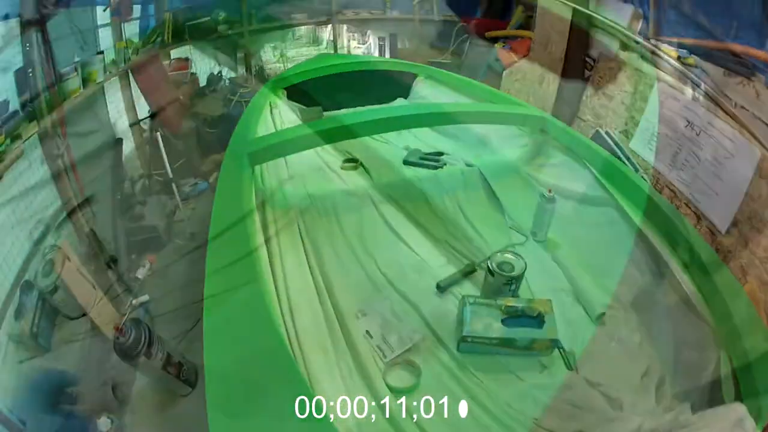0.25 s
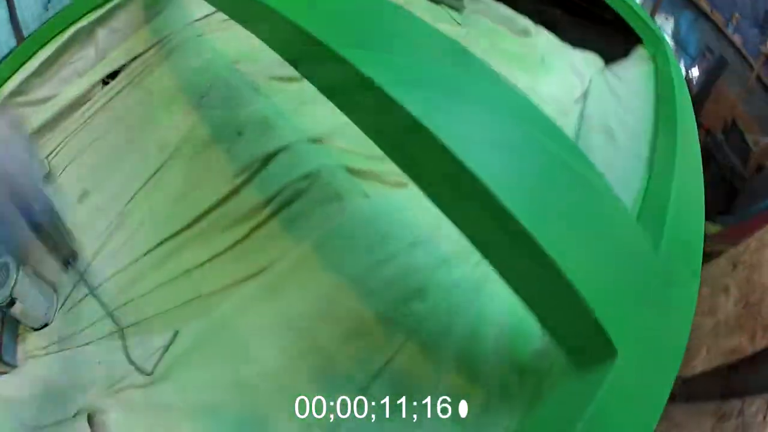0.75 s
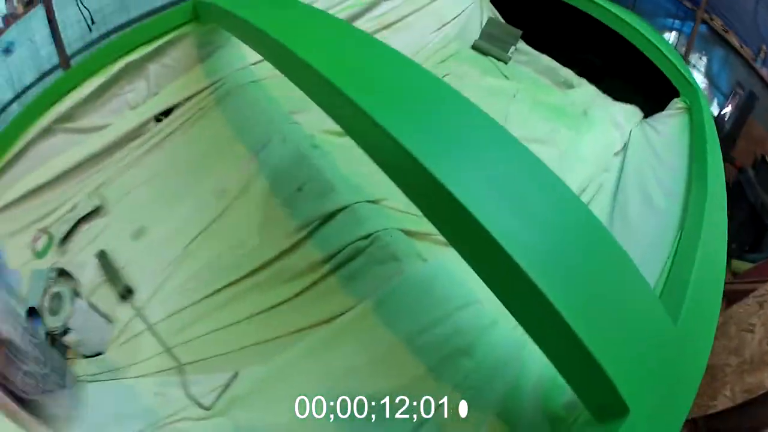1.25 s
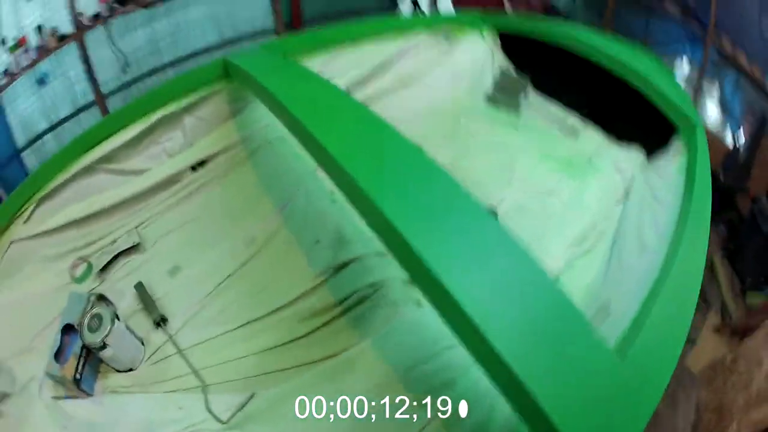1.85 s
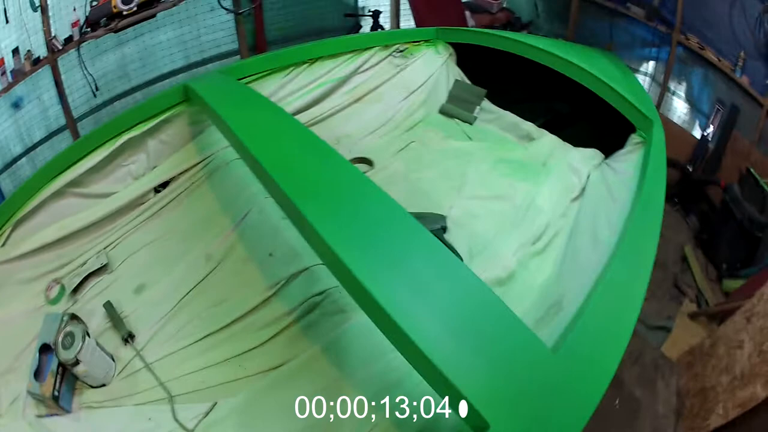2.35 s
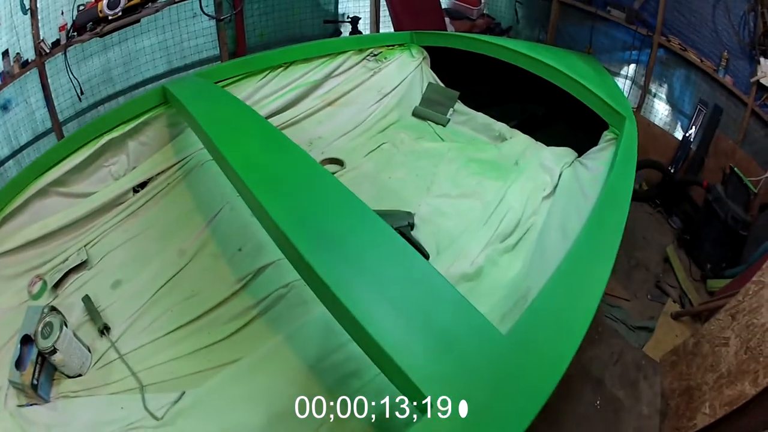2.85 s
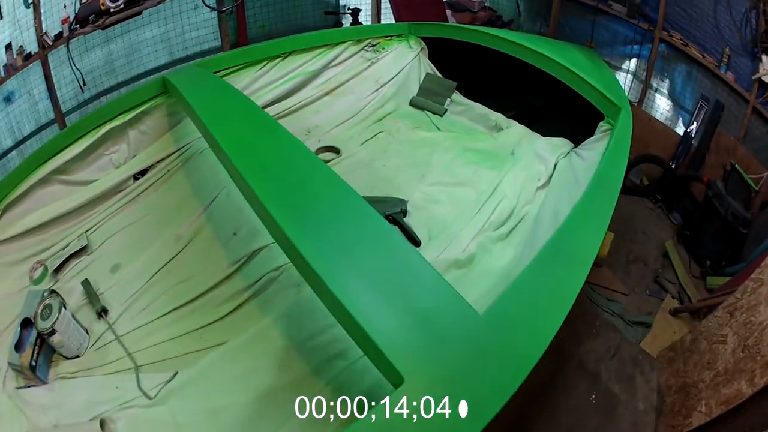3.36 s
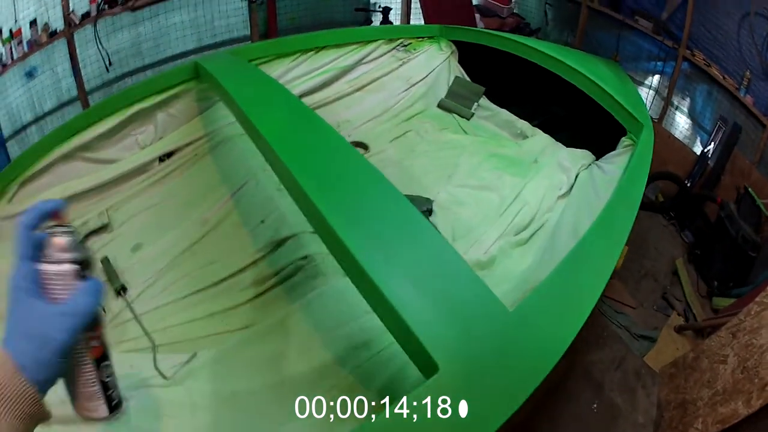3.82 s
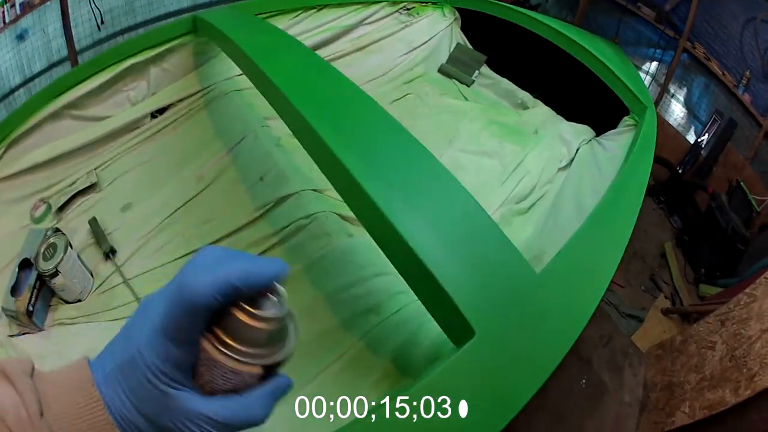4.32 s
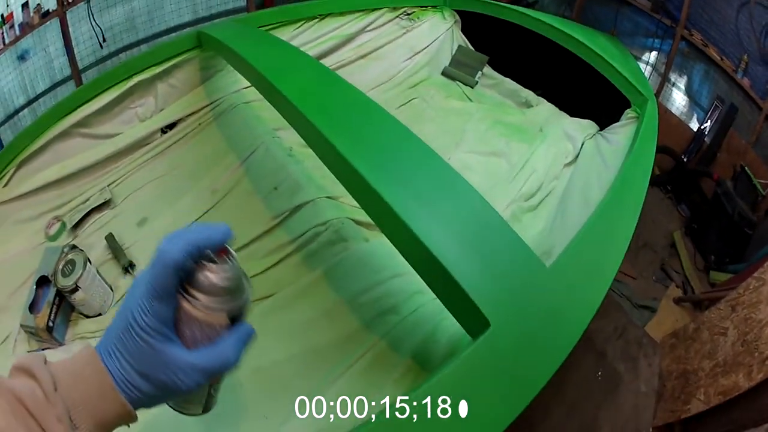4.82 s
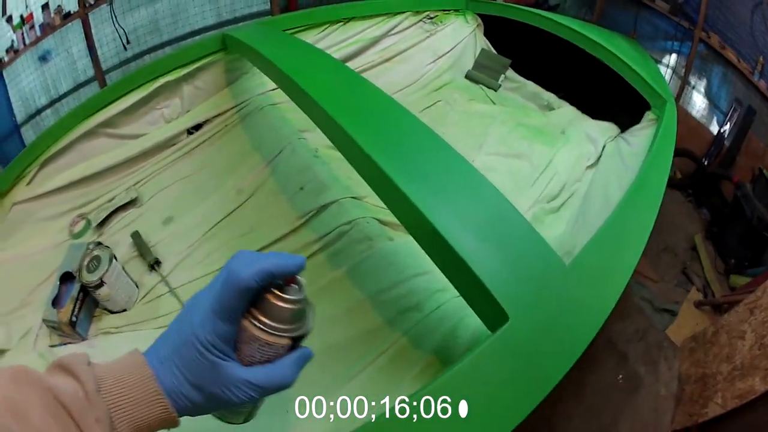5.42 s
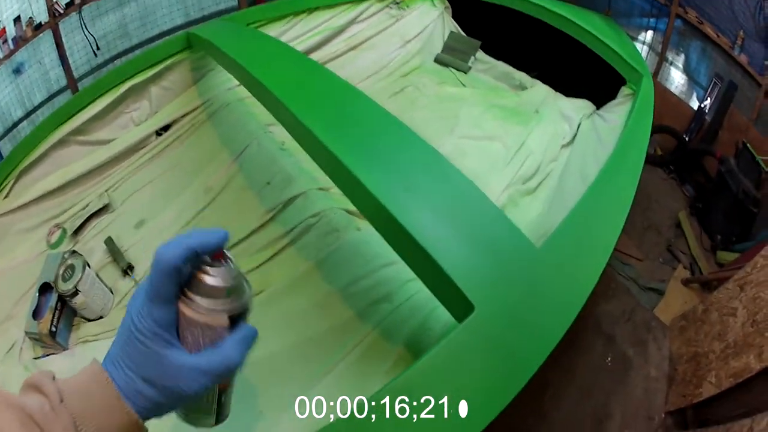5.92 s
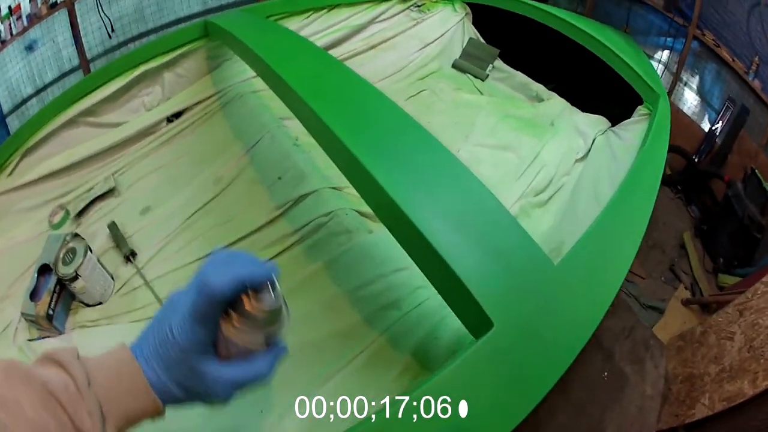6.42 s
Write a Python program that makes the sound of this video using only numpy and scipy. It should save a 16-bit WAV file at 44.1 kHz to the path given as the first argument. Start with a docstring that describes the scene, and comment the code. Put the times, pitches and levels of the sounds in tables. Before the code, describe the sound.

Low shop hum and a distant engine idling, a fast metallic paint-can rattle, quiet handling ticks, and finally the valve opening into spray hiss.

```python
"""The ball in a shaken spray can knocks the damped wall and the domed ends, ringing both, and skips on in tiny bounces.
Sleeve rustle, thin squeaks, ticks and low thuds surround the shaking; then the valve opens in two steps and gas hisses.
Behind it lie coloured shop hum and an engine idling outside, built from multiples of its cycle; a small room answers.
Low swings thump under hard knocks; a small camera clips the hardest and samples slowly, mirroring sound into the treble."""
import sys
import numpy as np
from scipy import signal
from scipy.fft import rfft, irfft
from scipy.io import wavfile
from scipy.ndimage import uniform_filter1d

SR = 44100
rng = np.random.default_rng(int(sys.argv[2]) if len(sys.argv) > 2 else 0)


def file_out(sig):
    """Save sig as 16-bit WAV at sys.argv[1]."""
    # one column per channel
    cols = np.atleast_2d(sig).T
    # limit, then scale
    lim = np.clip(cols, -1, 1)
    pcm = np.round(lim * 32767).astype(np.int16)
    wavfile.write(sys.argv[1], SR, pcm)


N = 294588

# ball knocks: (time [s], wall level [dB], wall pitch before it sags [Hz], dome level [dB],
# and for hard clanks the pitch that the struck spot favours [Hz])
KNOCKS = [(0.9147, -31, 1950, -44), (0.925, -20, 1800, -27), (0.9587, -2, 2107, 6, 3600),
          (0.965, -11.5, 1860, -10.5), (0.9842, -5, 1820, -26), (1.0072, -9.5, 1580, -11.5),
          (1.0251, -3, 1790, -13), (1.0361, -11, 1590, -18.5), (1.0424, -7, 1630, -11.5),
          (1.061, -8, 1650, 0, 3700), (1.0883, -16, 2070, -20), (1.1014, -4, 1740, -15),
          (1.1275, -29, 1700, -12.5), (1.1316, -6, 1610, -15.5), (1.1494, -9, 1817, -25),
          (1.1663, -8.5, 1750, -17.5), (1.169, 0.5, 1726, -9.5), (1.1972, -15, 1800, -22),
          (1.2063, -0.5, 1826, 0, 3700), (1.2119, -8.5, 1810, -5.5), (1.2146, -10, 1980, -6),
          (1.2209, -6, 1935, -10), (1.2509, -14, 1810, -17.5), (1.2644, -5.5, 1710, -31.5),
          (1.2752, -19, 1800, -19), (1.2849, -6.5, 1540, -19.5), (1.3057, -10, 1700, -4),
          (1.318, -13, 1620, -3, 3600), (1.34, -9.5, 1960, -11.5), (1.3567, -1.5, 1650, -8.5),
          (1.3874, -9.5, 1490, -11.5), (1.4002, -7, 1790, -10), (1.4068, -11, 1750, -25),
          (1.4175, -12, 1600, -18), (1.4241, -2.5, 1670, -14), (1.447, -20, 1870, -29),
          (1.4633, 5.5, 1866, -2, 3170), (1.48, -10, 1800, -25), (1.485, -13, 1850, -5, 3850),
          (1.5116, -13, 1630, -32), (1.521, -11.5, 1690, -23.5), (1.5305, -20, 1730, -33.5),
          (1.577, -5.5, 2100, -3, 3750), (1.5837, -9, 2160, 0, 3340), (1.6022, -7, 1595, -7.5),
          (1.6089, -12, 2200, -11.5), (1.6183, -12, 2140, -16.5), (1.6715, -14.5, 1930, -17.5),
          (1.6866, -20, 1950, -29), (1.697, -14, 1680, -25.5), (1.706, -17.5, 1690, -38.5),
          (1.7485, -7.5, 1800, 7, 4400), (1.7593, 2.5, 1900, -2), (1.771, -20, 1800, -10, 3040),
          (1.7741, -9.5, 1680, -24.5), (1.79, -12, 1890, -9), (1.7988, -19, 1700, -28),
          (1.8128, -18, 1700, -28), (1.8377, -18.5, 1590, -29.5), (1.8535, -15.5, 1490, -5, 4030),
          (1.8793, -7.5, 1820, -17), (1.8859, -10.5, 1960, -12, 3100), (1.9042, -18, 1800, -12),
          (1.919, -11.5, 1570, -10, 4870), (1.932, -12.5, 2150, -16), (1.962, -12.5, 1820, -21),
          (1.9635, -5, 1644, -13.5), (2.0004, -24, 1950, -34.5), (2.0288, -20, 1750, -34),
          (2.068, -23.5, 1380, 4, 3680), (2.0763, -31.5, 1940, -4, 3100), (2.0914, -6.5, 1960, -6, 3420),
          (2.1144, -22, 2100, -19.5), (2.13, -6, 1670, -12.5), (2.138, -11, 1870, -5, 4240),
          (2.1468, -11.5, 1550, -18), (2.155, -5.5, 1720, -6, 3040), (2.1733, -19, 1750, -16),
          (2.1867, -12, 2000, 0, 4050), (2.2044, -15, 1980, -3, 4070), (2.231, -4.5, 1780, -12),
          (2.247, -11, 1700, -19), (2.29, -9.5, 1630, -15), (2.3013, -16, 2270, -11, 3190),
          (2.331, -18.5, 1700, -23), (2.3581, -16, 1710, -15), (2.4075, -6, 1764, -18.5),
          (2.441, -10, 1710, -18), (2.4612, -12.5, 1720, -21.5), (2.478, -22.5, 1910, -32.5),
          (2.5048, -7, 1710, -4, 3100), (2.5588, -6.5, 1850, -18), (2.583, -12, 1570, -16),
          (2.5975, -11, 1890, -23.5), (2.627, -7, 1950, -3, 3620), (2.6633, -23, 1850, -35),
          (2.6833, -7.5, 1870, -2, 3270), (2.7086, -16, 1880, -17), (2.715, -34, 2060, -11, 3340),
          (2.7518, -5, 1870, -9, 4520), (2.802, -8.5, 1910, -9, 3360), (2.8268, -23, 1880, -22),
          (2.8461, -22.5, 1860, -16.5), (2.8612, -28, 1860, -23), (2.8933, -24, 1950, -22.5),
          (2.9462, -30.5, 1900, -29.5), (2.993, -18, 1870, -19.5, 3920), (3.0232, -25, 1880, -26),
          (3.1593, -23.5, 2220, -23), (3.2, -25.5, 1930, -29), (3.2624, -40, 1940, -38)]
# modes of the can wall: (multiple of its pitch, level [dB], t60 [s])
WALL = [(1, 10, 0.0092), (.8, -2.5, 0.01), (1.3, -11, 0.017), (.17, -8, .005)]
# modes of the domed ends: (frequency [Hz], level [dB], t60 [s])
DOME = [(600, -24.5, 0.017), (2620, -19.5, 0.02), (3181, -9, .012), (3477, -12, 0.016), (3784, -7.5, 0.011),
        (4166, -10.5, 0.013), (4620, -14.5, 0.011), (5240, -19.5, 0.013)]


def undb(db):
    """Decibels to linear gain."""
    return 10 ** (np.asarray(db) / 20)


def unit(x):
    """Scale to an rms of 1."""
    return x / np.sqrt(np.mean(x ** 2))


def curve(rows):
    """Gain from (time [s], level [dB]) rows, practically silent outside them."""
    s, db = np.transpose(rows)
    return undb(np.interp(np.arange(N) / SR, s, db, left=-140., right=-140.))


def noise(shape):
    """Noise of rms 1 coloured by (frequency [Hz], level [dB]) points, joined on a log frequency axis."""
    hz, db = np.transpose(shape)
    log_hz = np.log(np.arange(1, N // 2 + 2) * SR / N)
    colour = undb(np.interp(log_hz, np.log(hz), db))
    return unit(irfft(rfft(rng.standard_normal(N)) * colour, N))


def walk(rate):
    """Random level that glides to a new value `rate` times a second; spread near 1."""
    hold = int(SR / rate)
    steps = np.repeat(rng.standard_normal(N // hold + 1), hold)
    return uniform_filter1d(steps, hold)[:N]


def fade(t, t60):
    """Exponential decay by 60 dB in t60 seconds."""
    return np.exp(-np.log(1000) * t / t60)


def ring(t, modes, scatter_db, detune):
    """Modes struck at a new spot: each with its own strength and slight mistuning."""
    hz, db, t60 = np.transpose(modes)[:, :, None]
    strength, mistuning = rng.standard_normal((2, len(modes), 1))
    tones = np.sin(2 * np.pi * hz * (1 + detune * mistuning) * t)
    return np.sum(undb(db + scatter_db * strength) * fade(t, t60) * tones, axis=0)


def add(out, s, x):
    """Mix x into out from s seconds on."""
    i = int(s * SR)
    out[i:i + len(x)] += x[:len(out) - i]


def band(x, hz, width):
    """Resonant band-pass with its centre and width in Hz."""
    return signal.lfilter(*signal.iirpeak(hz, hz / width, fs=SR), x)


def cut(x, hz):
    """Steep low-pass."""
    return signal.sosfilt(signal.ellip(8, .2, 70, hz, fs=SR, output="sos"), x)


def shop_hum():
    """Coloured noise whose level drifts slowly and flickers a little."""
    # hum colour: (frequency [Hz], relative density [dB per Hz])
    hum_colour = [(12, -41), (20, -10), (54, -7), (97, -8.5), (129, -2), (156, -9), (320, -15.5),
                  (560, -22), (820, -21.5), (1600, -30), (5600, -42), (6200, -60.5)]
    # slow hum level: (time [s], level [dB])
    hum_level = [(0, -48.5), (.9, -52), (3.5, -52), (5.8, -50.5), (6.68, -47.5)]
    return curve(hum_level) * undb(1.2 * walk(9.1)) * noise(hum_colour)


def idle():
    """Multiples of an outside engine's cycle beat into a throb; each wavers in strength."""
    cycle_hz, throb_s = 8.12, 4.2  # cycles a second, a moment of one throb
    # engine partials: (multiple of the cycle, middle level [dB])
    partials = [(5, -65), (9, -56.5), (12, -63.5), (15, -56.5), (16, -55), (17, -61.5)]
    turn = 2 * np.pi * cycle_hz * (np.arange(N) / SR - throb_s) + 0.044 * walk(1.9)
    return sum(undb(db + 3.3 * walk(3.9)) * np.cos(k * turn) for k, db in partials)


def rustle():
    """Sleeve cloth noise: a faint bed under swishes that rise at their own pace and fade alike."""
    bed_db, bed_ends_s, fall_db_s = -64, 4.22, 128  # the bed lasts while the arm moves
    # cloth colour: (frequency [Hz], relative density [dB per Hz])
    cloth_colour = [(300, -5), (1200, -4), (2500, -4.5), (3500, -6.5), (6000, -15.5)]
    # swishes: (time of peak [s], level [dB], rise [dB per s])
    swishes = [(.25, -57.5, 60), (.38, -49, 90), (0.568, -50, 347), (3.295, -50, 900), (4.19, -57.5, 482)]
    t = np.arange(N) / SR
    gain = undb(bed_db) * (t < bed_ends_s)
    for s, db, rise in swishes:
        drop_db = np.where(t < s, rise * (s - t), fall_db_s * (t - s))
        gain = np.maximum(gain, undb(db - drop_db))
    return gain * undb(2.0 * walk(41)) * noise(cloth_colour)


def squeaks():
    """Faint thin tones that waver a little in phase and swell in and out."""
    # squeaks: (time [s], level [dB], pitch [Hz], length [s])
    squeak_rows = [(.88, -42, 1960, .08), (4.185, -62, 4030, .055)]
    out = np.zeros(N)
    for s, db, hz, length in squeak_rows:
        t = np.arange(int(length * SR)) / SR
        tone = np.sin(2 * np.pi * hz * t + .7 * walk(60)[:len(t)])
        add(out, s, undb(db) * np.hanning(len(t)) ** .5 * tone)
    return out


def thuds():
    """Soft low swings through the mount that wobble and sag in pitch as they die."""
    # thuds: (time [s], level [dB], starting pitch [Hz], t60 [s])
    thud_rows = [(0.568, -23.5, 166, 0.16), (0.609, -18, 117, 0.067), (0.638, -31.5, 103.2, 0.34)]
    out, t = np.zeros(N), np.arange(16384) / SR
    for s, db, hz, t60 in thud_rows:
        sag = 1 - 2.1 * np.minimum(t, .1)
        swing = np.sin(2 * np.pi * hz * t * sag + .6 * walk(130)[:len(t)])
        add(out, s, undb(db) * np.minimum(t * hz, 1) * fade(t, t60) * swing)
    return out


def thumps():
    """Low thumps under hard knocks: one short swing out and back, roughened by a faster shake."""
    # thumps: (time [s], swing peak before roughening [dB], length of a full swing [s])
    thump_rows = [(0.957, -14.5, 0.0045), (1.0605, -18.5, 0.005), (1.17, -19, 0.0043),
                  (1.2068, -12.5, 0.0058), (1.4623, -7, 0.0065), (1.5746, -22, 0.0046),
                  (1.7494, -6.5, 0.0075), (1.7564, -17.5, 0.0085), (1.8535, -17.5, 0.0032),
                  (1.961, -18.5, 0.0037), (2.068, -10.5, 0.0048), (2.187, -24, .005), (2.2044, -18, 0.0022),
                  (2.505, -33, .011), (2.6262, -15, 0.006), (2.684, -24, 0.008), (2.752, -21, 0.0025)]
    out = np.zeros(N)
    for s, db, length in thump_rows:
        turn = np.arange(int(0.81 * length * SR)) / SR / length  # stops before the full swing ends
        shake = 1 + 0.73 * np.sin(2 * np.pi * (4.0 * turn + rng.random()))
        swing = np.sin(2 * np.pi * turn) * np.exp(-1.2 * turn)
        add(out, s, undb(db) * swing / swing.max() * shake)
    return out


def ticks():
    """Glove, cap and valve tick: a sharp edge, then a short burst of noise around one colour."""
    t60_s, longer_per_db = 0.034, 0.06  # t60 at -50 dB; firmer ticks last longer
    # ticks: (time [s], burst level [dB], centre [Hz])
    tick_rows = [(0.6917, -38, 3700), (0.7704, -47.5, 3370), (0.782, -32.5, 4650), (3.305, -41.5, 1640),
                 (3.4215, -54, 3540), (3.4413, -54, 4110), (3.491, -51.5, 3706), (4.2988, -47, 4750),
                 (4.32, -46, 3950), (4.4073, -53, 1870), (5.0998, -49, 4300), (5.1234, -43, 3540),
                 (6.354, -54, 3650), (6.416, -46, 3470)]
    out, t = np.zeros(N), np.arange(4096) / SR
    for s, db, hz in tick_rows:
        burst = rng.standard_normal(len(t))
        coloured = unit(band(burst, hz, .4 * hz) + 0.23 * burst)
        body = fade(t, t60_s * np.exp(longer_per_db * (db + 50)))
        edge = 1.3 * fade(t, 0.0072)
        add(out, s, undb(db) * (body + edge) * coloured)
    return out


def spray():
    """Turbulent gas that sputters; the nozzle's resonance grows faster than the hiss."""
    open_s, swell_db_s = .005, 9  # each valve step's opening time, flow growth after it
    sputter_db, sputter_rate = 1.3, 60
    # valve steps: (time [s], flow at the step before it swells [dB])
    valve_steps = [(6.4, -50.5), (6.552, -43.5)]
    # hiss colour: (frequency [Hz], relative density [dB per Hz])
    jet_colour = [(100, -2), (300, -14), (2000, -24), (2900, -14), (5300, -9), (5800, -30)]
    t, flow = np.arange(N) / SR, 0
    for s, db in valve_steps:
        opening = np.clip((t - s) / open_s, 0, 1)
        flow = np.maximum(flow, opening * undb(db + swell_db_s * (t - s)))
    nozzle = unit(band(rng.standard_normal(N), 4750, 600))
    lows = undb(-6) * unit(band(rng.standard_normal(N), 1670, 1300))  # fuller lows of the open jet
    sputter = undb(sputter_db * walk(sputter_rate))
    return flow * sputter * (noise(jet_colour) + flow / flow.max() * (nozzle + lows))


def skips():
    """Dense tiny bounces of the ball, on two wall spots and the dome, dying down after each knock."""
    rate = 260  # average bounces a second on each spot
    skip_db, follow, settle_s = -38, 0.71, 0.031  # after a 0 dB knock, dB per dB of knock, before follow
    # vigour of the shaking, which keeps the ball skipping by itself: (time [s], level [dB])
    vigour = [(.86, -64), (.92, -47), (1.0, -43), (1.6, -37.5), (1.72, -45), (1.9, -38.5), (2.04, -54),
              (2.15, -41), (2.3, -36.5), (2.38, -60)]
    out, t, kicks = 0, np.arange(1024) / SR, np.zeros(N)
    for s, wall_db, _, dome_db, *_ in KNOCKS:
        add(kicks, s, undb([max(wall_db, dome_db)]))
    stir = signal.lfilter([1], [1, -np.exp(-1 / (settle_s * SR))], kicks) ** follow
    low_wall, high_wall = (np.multiply(WALL, (hz, 1, 1)) for hz in (1680, 1930))
    for db, modes in ((-5, low_wall), (-6, high_wall), (-3.5, DOME)):
        timing, force = rng.random((2, N))
        taps = (timing < rate / SR) * undb(np.minimum(-4.0 * np.log(force), 14.0))
        out = out + undb(db) * unit(signal.fftconvolve(taps, ring(t, modes, 0, 0))[:N])
    return (undb(skip_db) * stir + curve(vigour)) * out


def knocks():
    """Each knock of the ball rings the paint-damped wall and clanks the dome with a noisy crack."""
    wall_rise_s, wall_scatter_db, wall_detune = 0.00095, 1.5, .015
    spot_db, spot_t60_s = -1.5, .011
    crack_db, crack_t60_s, crack_above_hz = 0.57, 0.0064, 200
    out, t = np.zeros(N), np.arange(1024) / SR
    rise = 1 - np.exp(-(t / wall_rise_s) ** 2)  # the wall yields under the ball before it rings
    thin = signal.butter(2, crack_above_hz, "high", fs=SR)
    sag = t * (1.03 - 11.0 * t)  # the wall's pitch sinks as the paint runs back over the spot
    for s, wall_db, hz, dome_db, *spot in KNOCKS:
        wall = rise * ring(sag, np.multiply(WALL, (hz, 1, 1)), wall_scatter_db, wall_detune)
        dome = ring(t, DOME, 3.6, .07)
        for spot_hz in spot:
            dome = dome + undb(spot_db) * fade(t, spot_t60_s) * np.sin(2 * np.pi * spot_hz * t)
        crack = signal.lfilter(*thin, rng.standard_normal(len(t)))
        dome = dome + undb(crack_db) * fade(t, crack_t60_s) * crack
        dome_rise = np.minimum(t / 0.00025, 1)
        add(out, s, undb(wall_db) * wall + undb(dome_db) * dome_rise * dome)
    return out


def room(x):
    """Close sheets and benches answer quickly, the shed walls more slowly."""
    t, tail = np.arange(SR // 2) / SR, 0
    for db, t60 in ((-14.5, 0.13), (-25.5, 0.18)):  # level [dB] and t60 [s]: near, then far
        tail = tail + undb(db) * fade(t, t60) / np.sqrt(t60)
    scale = np.sqrt(2 * np.log(1000) / SR)  # makes the levels hold for the tail's energy
    tail = tail * np.minimum(t / 0.0032, 1) * rng.standard_normal(len(t)) * scale
    return x + signal.fftconvolve(x, tail)[:N]


def scene():
    """One microphone feeds both channels; they are almost equal and differ slightly in the lowest bass."""
    in_room = room(knocks() + skips() + ticks() + squeaks())
    mid = in_room + thumps() + thuds() + rustle() + spray() + shop_hum() + idle()
    high_pass_hz = (10, 16)  # left, right
    return np.array([signal.lfilter(*signal.butter(1, hz, "high", fs=SR), mid) for hz in high_pass_hz])


def record(dry):
    """A slow converter overloads, holds samples as stairs (mirroring sound into the treble) and hisses."""
    hold_hz, hold_steps = 12000, 4  # samples a second, points drawn per stair
    clip, hiss_db = 1.0, -78  # hiss before the treble cuts
    first_top_hz, top_hz = 15250, 16300
    edge = signal.butter(8, 5650, fs=SR, output="sos")
    slow = signal.resample_poly(signal.sosfilt(edge, dry), hold_hz, SR, axis=1)
    stairs = np.repeat(np.clip(slow, -clip, clip), hold_steps, axis=1)
    held = signal.resample_poly(stairs, SR, hold_hz * hold_steps, axis=1)[:, :N]
    held = held + undb(hiss_db) * rng.standard_normal(N)
    # overshoot that passes full scale after the first cut clips again and spills a little above it
    return cut(np.clip(cut(held, first_top_hz), -1, 1), top_hz)


dry = scene()
out = record(dry)
file_out(out)
```